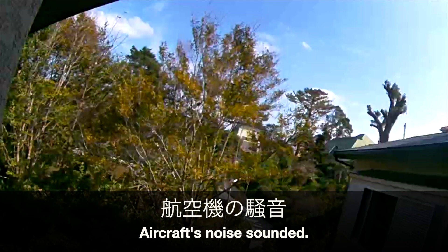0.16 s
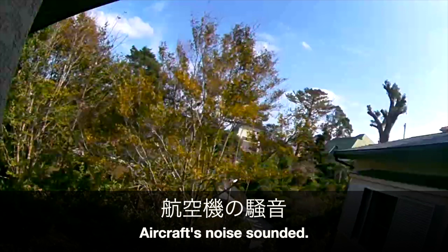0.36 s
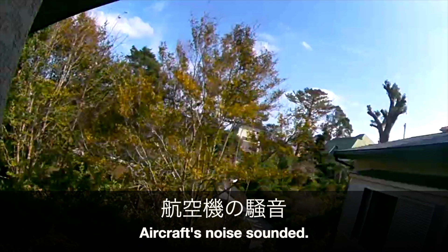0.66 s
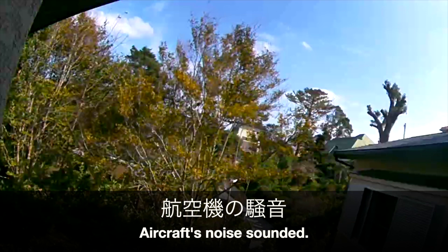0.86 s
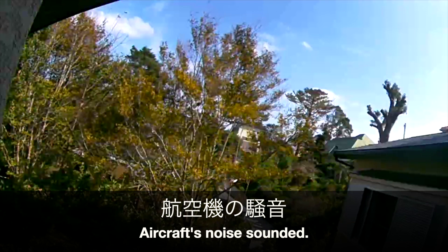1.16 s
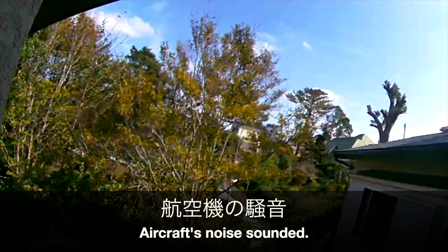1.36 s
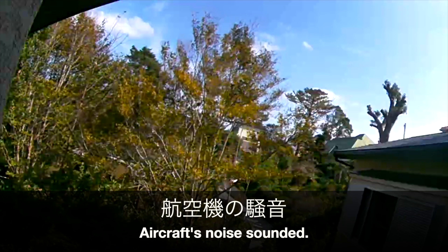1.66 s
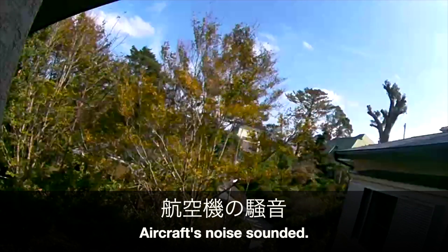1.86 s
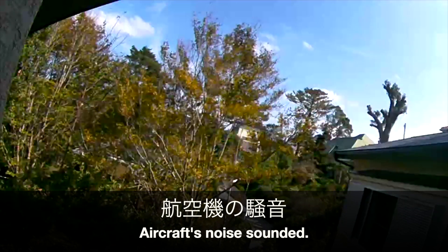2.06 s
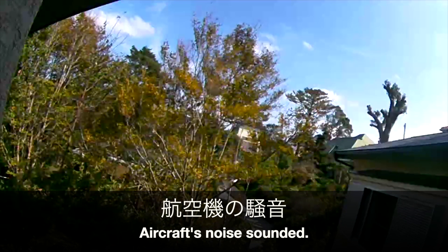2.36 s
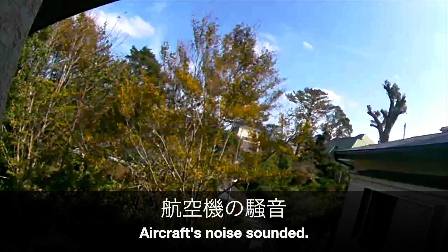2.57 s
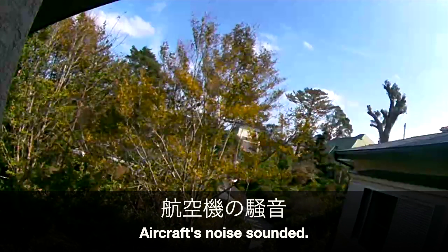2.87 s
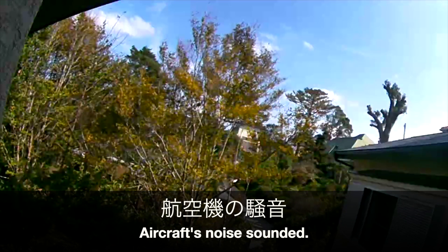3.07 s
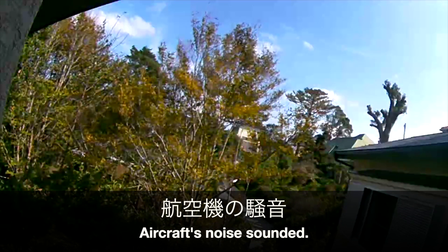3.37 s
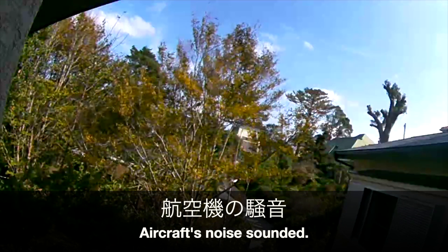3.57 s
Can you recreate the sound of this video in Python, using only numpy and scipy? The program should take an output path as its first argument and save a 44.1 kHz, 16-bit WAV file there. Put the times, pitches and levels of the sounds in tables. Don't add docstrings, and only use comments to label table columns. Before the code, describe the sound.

Distant propeller plane droning low and unsteady over a garden, with soft hollow roar and faint hiss.

```python
import sys
import numpy as np
from scipy import signal
from scipy.fft import rfft, irfft, next_fast_len
from scipy.io import wavfile
from scipy.ndimage import uniform_filter1d, map_coordinates

SR = 44100
rng = np.random.default_rng(int(sys.argv[2]) if len(sys.argv) > 2 else 0)


def wav_out(sig):
    wavfile.write(sys.argv[1], SR, np.round(np.clip(np.atleast_2d(sig).T, -1, 1) * 32767).astype(np.int16))


def voltage_ratio(decibels):
    exponent = np.asarray(decibels, float) / 20
    return 10 ** exponent


N = 163170


def unit(x):
    return x / np.sqrt(np.mean(x ** 2) + 1e-20)


def along(points, hz):
    point_hz, point_db = np.transpose(points)
    return np.interp(np.log(hz + 1), np.log(point_hz + 1), point_db, left=-120, right=-120)


def curves(rows, t):
    start_s, *columns = np.transpose(rows)
    return [np.interp(t, start_s, column) for column in columns]


def wobble(rate):
    return map_coordinates(rng.standard_normal(80), [np.arange(N) * rate / SR])


def filtered(x, response):
    size = next_fast_len(N + SR // 2)
    spectrum = rfft(x, size) * response(np.fft.rfftfreq(size, 1 / SR))
    return irfft(spectrum, size)[..., :N]


def patchy(depth_db, shape):
    hz, t, z = signal.stft(rng.standard_normal(N), SR, nperseg=1024)
    patches = uniform_filter1d(rng.standard_normal(z.shape), size=6, axis=0)
    patches = uniform_filter1d(patches, size=14, axis=1)
    z = z * voltage_ratio(depth_db * unit(patches)) * shape(hz[:, None], t)
    return signal.istft(z, SR, nperseg=1024)[1][:N]


# start_s [s], pitch_hz [Hz]
BLADE_PITCH = [(0, 73.3), (.5, 73.5), (1, 70.8), (1.5, 70), (2, 69.54), (2.5, 68.63), (3, 67.7),
               (3.7, 66.55)]
# start_s [s], level_db [dB]
BLADE_TONE = [(0.04, -17.5), (0.27, -17.5), (0.53, -26.5), (1.21, -25.5), (1.32, -30), (1.42, -25.5),
              (1.55, -29.5), (1.65, -26.5), (1.73, -32), (1.81, -27), (1.91, -30.5), (2.48, -26),
              (2.58, -22.5), (2.94, -25), (2.98, -29.5), (3.26, -26), (3.5, -33.5), (3.66, -33)]
# start_s [s], level_db [dB], lag_rad [rad]
BLADE_OCTAVE = [(0, -38, -3), (.3, -34, -2), (.64, -31, -5), (.88, -30.5, -2.5), (1.06, -36.5, -2.5),
                (1.25, -49, -2.5), (1.45, -49, -5.5), (1.75, -41.5, -1), (1.87, -49, 1.5), (1.95, -36.5, 2),
                (2.08, -41.5, -2), (2.4, -37, -4.5), (2.62, -34, -5), (2.81, -27, -5.5), (3, -31, -6),
                (3.27, -31.5, -6.5), (3.47, -37.5, -7), (3.7, -35, -3.5)]
# start_s [s], level_db [dB]
BLADE_THIRD = [
    (0, -57.5),
    (.6, -54),
    (1.1, -48.5),
    (1.6, -53),
    (1.95, -43.5),
    (2.5, -52),
    (3.25, -45),
    (3.7, -50.5),
]


def propeller():
    flutter_db, flutter_rad = .7, .04
    t = np.arange(N) / SR
    pitch_hz, = curves(BLADE_PITCH, t)
    turn = 0.41 + 2 * np.pi * np.cumsum(pitch_hz) / SR + .15 * wobble(2.5)
    tone_db, = curves(BLADE_TONE, t)
    octave_db, octave_lag = curves(BLADE_OCTAVE, t)
    third_db, = curves(BLADE_THIRD, t)
    fourth_db = -58.5 + 1 * (t - 2)
    parts = [(tone_db, 0), (octave_db, octave_lag), (third_db, 2.5), (fourth_db, 1)]
    out = np.zeros(N)
    for k, (level_db, lag_rad) in enumerate(parts, 1):
        level = voltage_ratio(level_db + flutter_db * wobble(5.8))
        out += level * np.cos(k * turn + lag_rad + k * flutter_rad * wobble(6.2))
    return np.sqrt(2) * out


# start_s [s], level_db [dB], brightness [dB per octave],
# wall_echo [gain], eaves_ring_db [dB]
ROAR_COURSE = [(0, -48.5, 1.1, .2, -0.5), (.27, -44, -1.1, 0.17, -2), (.38, -40.5, 0.6, 0.49, 3.5),
               (.55, -38.5, 0, 0.18, 3.5), (.72, -35.5, 0.4, 0.22, 7.5), (.85, -41, 1.5, 0.15, -.5),
               (1.1, -45.5, 3.5, 0.16, -1.5), (1.2, -45, -.5, .3, 3.5), (1.6, -44.5, 0, 0.17, 2),
               (1.85, -47, -.5, 0.24, -1.5), (2.2, -44.5, -1.3, 0.32, -2), (2.32, -40.5, 1.5, .6, 3),
               (2.55, -44.5, -0.5, 0.27, -4), (2.86, -41.5, -0.05, 0.39, -0.2), (3.1, -45.5, 1, 0.25, 4),
               (3.35, -44, 1, 0.32, 6), (3.56, -42, 0.9, 0.2, 8.5), (3.7, -40.5, 2.5, 0.26, 5)]
# delay_ms [ms], gain [ratio]
GARDEN_ECHOES = [
    (1.5, 0.05),
    (4.3, 0.067),
    (5.9, .15),
]
# pitch_hz [Hz], width_hz [Hz], lift_db [dB]
WALL_MODES = [(270, 25, 5), (313, 90, 6.5), (368.7, 8.3, 7.5), (450, 5.3, 6), (511.4, 24, 5),
              (558.4, 27, 8), (610, 16, 10.5), (774, 25, 5), (949.6, 12, 9.5), (1031, 24, 5),
              (1193, 12, 5.5), (1360, 65, -5.5), (1990, 21, -1), (2080, 35, 7)]


def roar():
    def garden(hz):
        echoes = 1 + sum(gain * np.exp(-2j * np.pi * hz * ms / 1000) for ms, gain in GARDEN_ECHOES)
        lift_db = sum(db / (1 + (2 * (hz - centre) / width) ** 2) for centre, width, db in WALL_MODES)
        return voltage_ratio(lift_db) * echoes

    level_db = curves(ROAR_COURSE, np.arange(N) / SR)[0] + .7 * wobble(6)
    noise = patchy(depth_db=1.3, shape=roar_shape)
    return voltage_ratio(level_db) * unit(filtered(noise, garden))


# pitch_hz [Hz], level_db [dB]
NEAR_COLOUR = [(190, -19.5), (400, -2.5), (545, -5), (770, -10.5), (1350, -13), (2500, -17), (2600, -31.5),
               (4500, -50)]
# pitch_hz [Hz], level_db [dB]
FAR_COLOUR = [(190, -20), (340, 0), (570, -5.5), (770, -9.5), (1350, -10), (2550, -21.5), (3300, -36),
              (4500, -52)]


def roar_shape(hz, t):
    _, slope, wall, eaves_db = curves(ROAR_COURSE, t)
    blade_hz, = curves(BLADE_PITCH, t)
    far = np.clip(t / 2.63, 0, 1)
    at_source_hz = hz * blade_hz.mean() / blade_hz
    colour_db = (1 - far) * along(NEAR_COLOUR, at_source_hz) + far * along(FAR_COLOUR, at_source_hz)
    colour_db = colour_db + slope * np.log2((hz + 1) / 600)
    eaves = eaves_db * np.exp(-((hz - 1000) / 170) ** 2)
    whine = 1.5 * np.exp(-((hz - 34.8 * blade_hz) / 48) ** 2)
    wall_ms = 2.157
    wall_comb = 1 + wall * np.exp(-2j * np.pi * hz * wall_ms / 1000)
    gain = voltage_ratio(colour_db + eaves + whine) * wall_comb
    return gain / np.linalg.norm(gain, axis=0)


# pitch_hz [Hz], level_db [dB]
EXHAUST_COLOUR = [(20, -17), (34, -15), (45, -10.5), (88, -6), (112, 0.6), (150, -2.5), (180, -1),
                  (260, -16.5)]


def rumble():
    noise = patchy(depth_db=1.5, shape=lambda hz, t: 1)
    noise = filtered(noise, lambda hz: voltage_ratio(along(EXHAUST_COLOUR, hz)))
    level_db = -42.5 + wobble(4)
    return voltage_ratio(level_db) * unit(noise)


# pitch_hz [Hz], level_db [dB]
MICROPHONE_COLOUR = [(310, 0.5), (2550, 3), (3600, -0.6), (6500, -0.1), (7050, -2.5), (7500, -9),
                     (7900, -22.5), (8240, -40)]


def hiss():
    noise = filtered(rng.standard_normal(N), lambda hz: voltage_ratio(along(MICROPHONE_COLOUR, hz)))
    return voltage_ratio(-62.5) * unit(noise)


def scene():
    mix = propeller() + roar() + rumble()
    return mix[None]


def roll_off(x):
    return signal.sosfilt(signal.butter(12, 8250, fs=SR, output="sos"), x)


def record(dry):
    mix = dry + hiss()
    return roll_off(mix)


dry = scene()
out = record(dry)
wav_out(out)
```